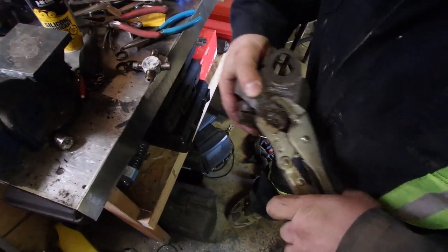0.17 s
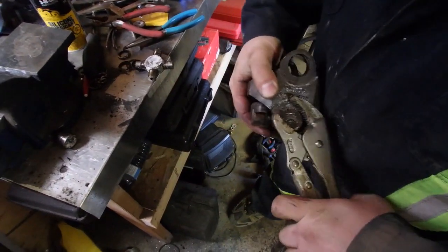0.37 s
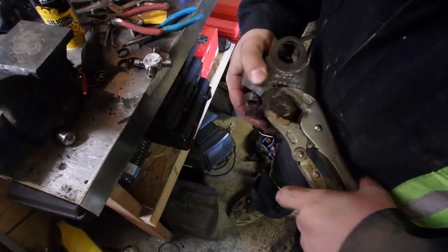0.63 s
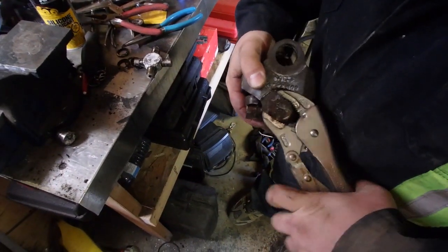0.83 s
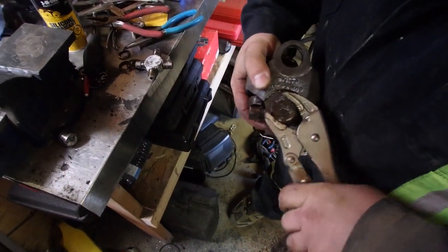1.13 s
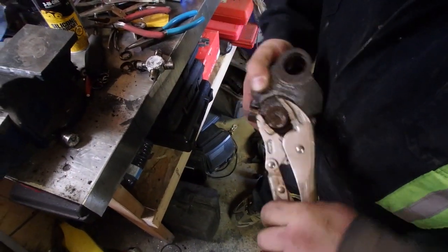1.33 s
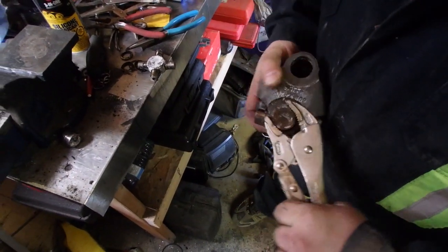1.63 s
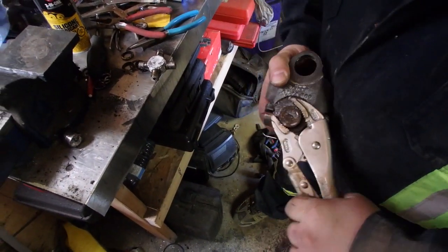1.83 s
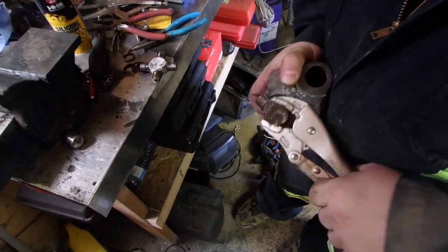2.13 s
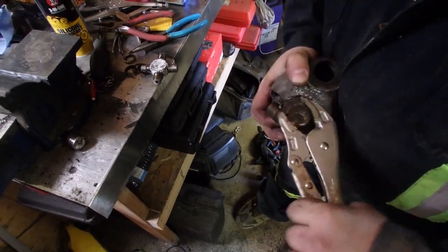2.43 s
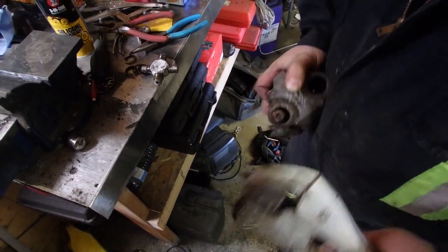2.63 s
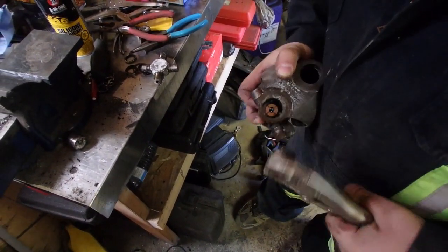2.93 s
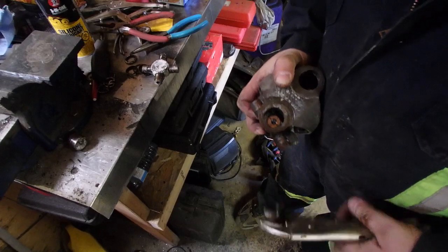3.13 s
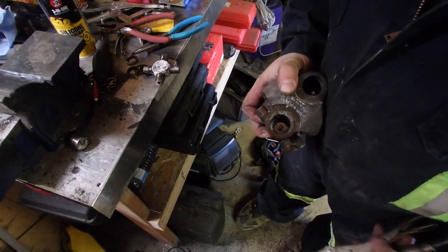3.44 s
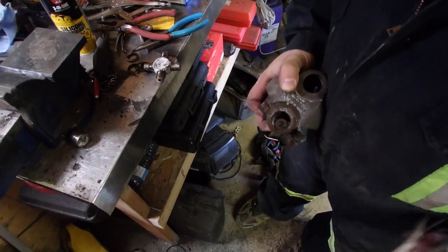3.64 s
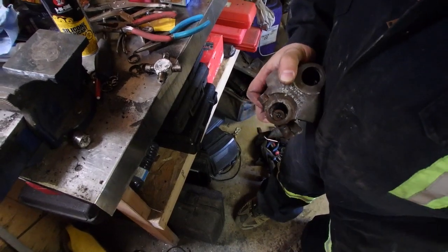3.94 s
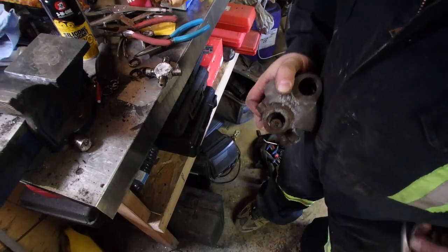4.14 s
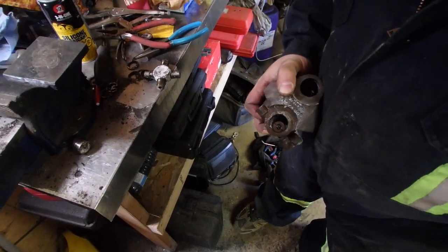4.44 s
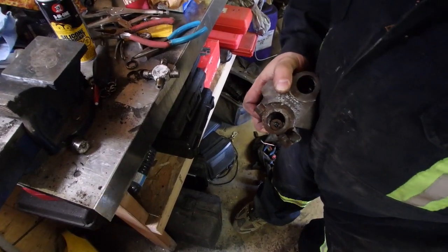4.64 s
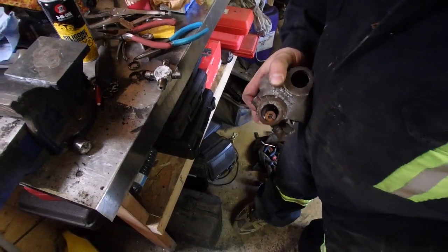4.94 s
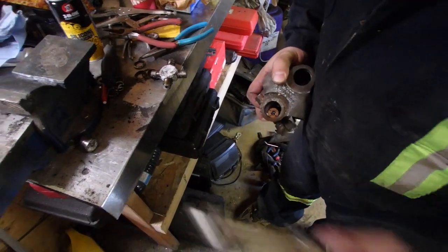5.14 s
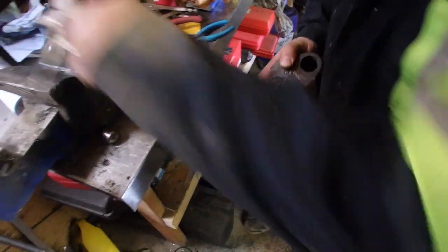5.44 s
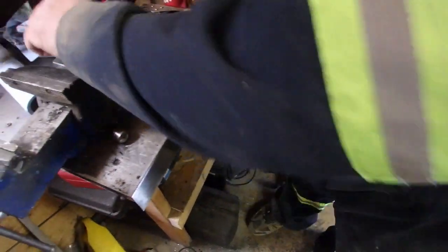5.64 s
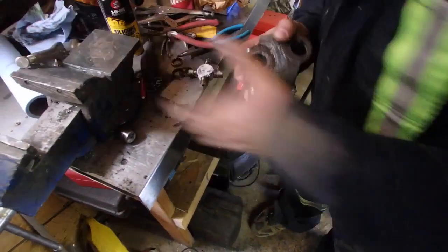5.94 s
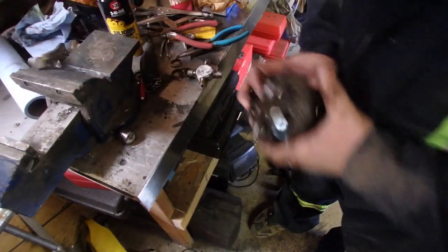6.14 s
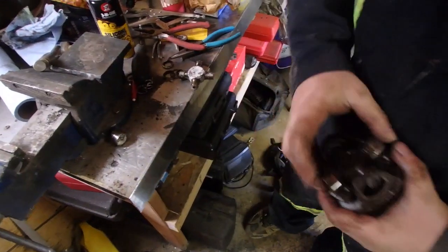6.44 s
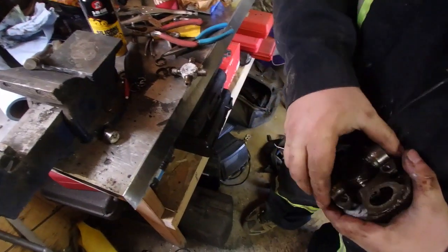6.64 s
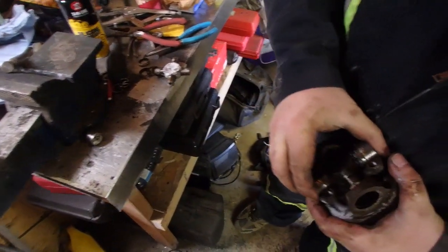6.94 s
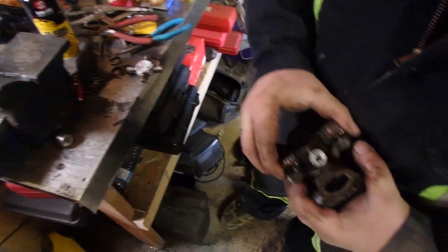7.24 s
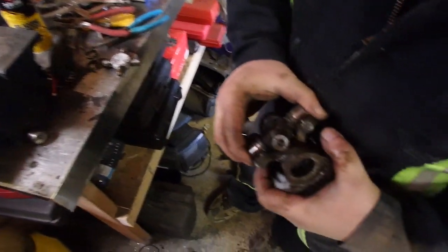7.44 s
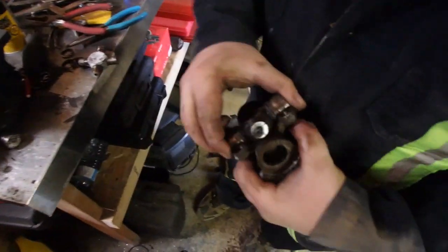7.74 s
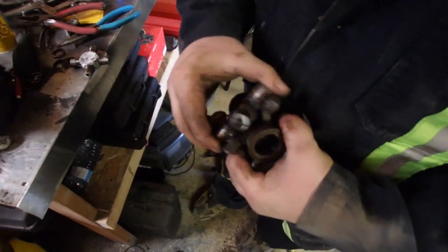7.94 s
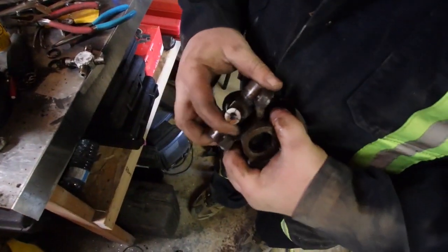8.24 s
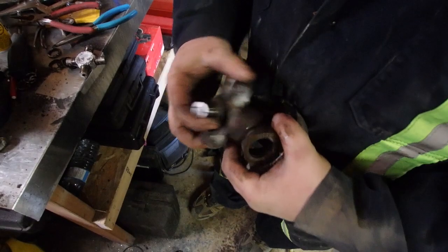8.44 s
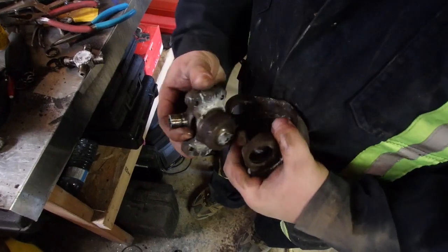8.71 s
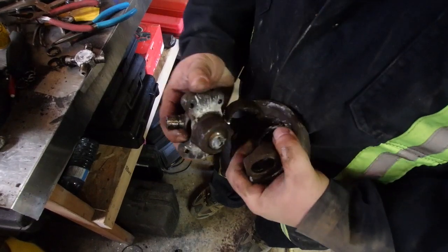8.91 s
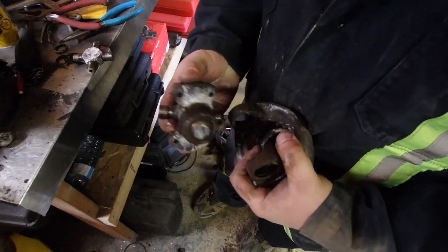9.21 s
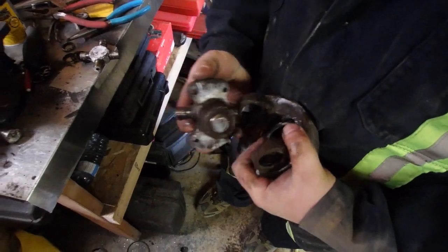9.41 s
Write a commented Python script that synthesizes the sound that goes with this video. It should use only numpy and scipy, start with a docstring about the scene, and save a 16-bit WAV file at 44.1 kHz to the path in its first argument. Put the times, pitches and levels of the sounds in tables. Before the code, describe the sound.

Locking pliers make a few short, bright clicks against a steel part, close by, over the constant chugging and hissing of an air compressor in a small workshop. Past the middle come more clicks, a brief clatter as the tool lands on the bench, and some last clinks. The microphone's level dips after each sharp hit and recovers, and the compressor carries on alone to the end.

```python
"""A piston air compressor runs steadily in a small garage, throbbing and hissing: every turn of the
pump repeats the same air, piston and valve beats, over churning air and a ringing housing.
Close to the camera, locking pliers click on a steel joint and clatter down on the workbench.
Each sharp click makes the camera's gain control duck the compressor, which then swells back."""
import sys
import numpy as np
from scipy import signal
from scipy.fft import rfft, irfft, next_fast_len
from scipy.io import wavfile
from scipy.ndimage import uniform_filter1d, map_coordinates

SR = 44100
rng = np.random.default_rng(int(sys.argv[2]) if len(sys.argv) > 2 else 0)


def generate_wav(sig):
    """Save sig (samples, or channels by samples) to the path in sys.argv[1] as 16-bit PCM at SR."""
    pcm = np.round(np.clip(np.atleast_2d(sig).T, -1, 1) * 32767).astype(np.int16)
    wavfile.write(sys.argv[1], SR, pcm)


N = 422037

PUMP_HZ = 19.5823  # turns each second
# Air puff, piston and valve beats. Each row: fraction of the turn, weight in dB, dull above this in Hz.
PUMP_BEATS = [(0.21, -1.9, 3000), (0.295, -1.2, 3000), (0.493, -4.1, 3000), (0.588, 13.3, 210),
              (0.771, -8.2, 3000), (0.981, -4.3, 3000)]


def amp(db):
    """Decibels to amplitude."""
    return 10 ** (np.asarray(db) / 20)


def unit(x):
    """Scale to an rms of one."""
    return x / np.sqrt(np.mean(x ** 2) + 1e-20)


def along(points, hz):
    """A curve through (Hz, value) points on a log frequency axis."""
    freqs, values = np.transpose(points)
    return np.interp(np.log(hz + 1), np.log(freqs + 1), values)


def bumps(rows, hz):
    """Gain in dB of narrow peaks or dips."""
    return sum(db / (1 + (2 * (hz - centre) / width) ** 2) for centre, width, db in rows)


def wobble(rate):
    """A smooth random curve, rate knots a second."""
    knots = rng.standard_normal(int(N * rate / SR) + 4)
    return map_coordinates(knots, [np.arange(N) * rate / SR])


def filtered(x, response):
    """Shape the spectrum of x by response(hz)."""
    n = x.shape[-1]
    padded = next_fast_len(n + 4096)
    return irfft(rfft(x, padded) * response(np.fft.rfftfreq(padded, 1 / SR)), padded)[..., :n]


def noise(level, size):
    """Stereo noise with level(hz) dB per Hz; the microphones agree less in the treble."""
    # Stereo width. Each row: frequency in Hz, side minus mid in dB.
    width = [(160, -52), (270, -24), (440, -15), (730, -27), (1200, -15), (2000, -86), (3200, -10),
             (5400, -9.5), (8800, -6), (14000, 1)]
    mid, side = filtered(rng.standard_normal((2, size)), lambda hz: amp(level(hz)) * np.sqrt(SR / 2))
    side = filtered(side, lambda hz: amp(along(width, hz)))
    return np.array([mid + side, mid - side])


def treble_meter(x):
    """Rms of the treble over 2 ms."""
    treble = signal.sosfilt(signal.butter(2, 2800, "high", fs=SR, output="sos"), x)
    power = uniform_filter1d(np.mean(treble ** 2, axis=0), size=88)
    return np.sqrt(np.abs(power) + 1e-12)


def place_hit(track, start, db, hit):
    """Mix in a hit with its treble peak at db."""
    part = track[:, round(start * SR):][:, :hit.shape[1]]
    part += (amp(db) * hit / treble_meter(hit).max())[:, :part.shape[1]]


def bench_clatter(rise_s=0.0017):
    """Loose jaws and handles clatter on the dull bench top."""
    # The pliers brush, land and settle. Each row: start in seconds, treble level in dB, T60 in seconds.
    drops = [(5.911, -21.5, 0.088), (5.9268, -8.5, 0.15), (5.989, -20.5, 0.12)]
    # Tone of the knock. Each row: frequency in Hz, relative level in dB.
    knock = [(60, -31.5), (180, -5), (380, 4.5), (900, 1.5), (1600, -2), (2400, -1), (3300, 3), (5000, -1),
             (7000, -0.5), (10000, -6.5), (14500, -25)]
    # Resonances of the bench top. Each row: centre in Hz, width in Hz, gain in dB.
    boards = [(260, 73, 8), (457, 160, 9), (686, 73, -3), (910, 95, 12), (1320, 110, 12), (1750, 250, 7)]
    track, t = np.zeros((2, N)), np.arange(SR // 4) / SR
    for start, db, t60 in drops:
        clatter = noise(lambda hz: along(knock, hz) + bumps(boards, hz), size=len(t))
        place_hit(track, start, db, clatter * (1 - np.exp(-t / rise_s)) * amp(-60 * t / t60))
    return track


def plier_clicks(firm_db=-9.5, firm_t60=0.068, crack_t60=0.02, room_db=-13, room_t60=0.26):
    """Hand-damped steel on steel: a crack, a brief ring, then the garage's answer."""
    # Each row: start in seconds, treble level in dB, brightest pitch in Hz, its emphasis in dB.
    contacts = [(0.15, -14, 3530, 18), (.986, -20, 3600, 11), (1.491, -8.3, 3920, 5),
                (4.964, -22.5, 8500, 8), (5.1841, -7, 6200, 6), (5.221, -16.5, 3840, 21),
                (5.7628, -14, 7540, 8), (5.786, -9, 6900, 6), (5.8672, -21, 7500, 6), (6.2927, -8, 2920, 5),
                (6.310, -16, 6900, 10), (6.485, -13, 4400, 27.5)]
    # Resonances of the pliers and joint. Each row: centre in Hz, width in Hz, gain in dB.
    steel = [(2650, 300, 4), (3060, 190, 23), (3530, 350, 4.5), (4010, 270, 12), (4870, 200, 10),
             (5530, 260, 16), (5770, 200, 0), (6500, 250, 11), (7050, 490, 14.5), (7140, 200, 4),
             (8600, 270, 13), (9600, 300, 2), (11600, 450, 7)]
    # Tone of the bare contact. Each row: frequency in Hz, relative level in dB.
    impact = [(200, -20), (1000, -7), (2000, 3), (3500, 0), (8000, 2.5), (12000, -3), (15000, -16)]
    track, t = np.zeros((2, N)), np.arange(SR // 4) / SR
    for start, db, bright_hz, focus_db in contacts:
        ring_t60 = firm_t60 * amp(0.88 * (db - firm_db))  # harder contacts ring longer
        crack_db = 5 - 1.2 * focus_db  # purer ones crack less
        focus = lambda hz: focus_db * np.exp(-.5 * (np.log2((hz + 1) / bright_hz) / 0.15) ** 2)
        ring = unit(noise(lambda hz: along(impact, hz) + bumps(steel, hz) + focus(hz), size=len(t)))
        crack = unit(noise(lambda hz: along(impact, hz), size=len(t)))
        fade = amp(-60 * t / ring_t60) + amp(room_db - 60 * t / room_t60)
        place_hit(track, start, db, ring * fade + crack * amp(crack_db - 60 * t / crack_t60))
    return track


def worker_shadow(machine, centre_hz=380, width_hz=110, sway_db=0.5):
    """The leaning worker shades or reflects the pump; small sways keep the low mids wandering."""
    # Each row: middle in seconds, half length in seconds, gain in dB, extra low-mid gain in dB.
    leans = [(5.75, 0.36, -1.5, 2), (6.8, 0.64, 0.8, -4), (8.4, 0.73, 0.5, 1.5)]
    t = np.arange(N) / SR
    middle_s, half_s, level_db, extra_db = np.transpose(leans)
    leaning = np.exp(-.5 * ((t[:, None] - middle_s) / half_s) ** 2)
    low_mids = filtered(machine, lambda hz: np.exp(-((hz - centre_hz) / width_hz) ** 2))
    low_mid_gain = amp(leaning @ extra_db + sway_db * wobble(rate=0.78))
    return amp(leaning @ level_db) * (machine + (low_mid_gain - 1) * low_mids)


def housing_chug(machine, ring_hz=1020, width_hz=160, depth_db=1.1, loudest_at=0.42):
    """The ring of the housing swells and fades once a turn."""
    turns = np.arange(N) / SR * PUMP_HZ
    ring = filtered(machine, lambda hz: np.exp(-((hz - ring_hz) / width_hz) ** 2))
    swell = unit(amp(depth_db * np.cos(2 * np.pi * (turns - loudest_at))))
    return machine + (swell - 1) * ring


def air_hiss(flutter_db=0.5, throb_db=0.47):
    """Air hisses almost evenly, with faint whistles and a slight throb on each turn."""
    # Tone of the hiss. Each row: frequency in Hz, level in dB per Hz.
    spectrum = [(600, -93), (1500, -63.5), (2300, -67), (2800, -67), (3300, -64.5), (4100, -62.5),
                (4800, -65.5), (5400, -65.5), (6000, -68), (7000, -67), (8000, -73.5), (10300, -77.5),
                (12000, -85), (14500, -100)]
    # Whistling resonances. Each row: centre in Hz, width in Hz, gain in dB.
    whistles = [(3146, 29, 10), (5330, 18, 9), (6940, 23, 10), (8750, 28, 7), (2249, 50, 6.5)]
    t = np.arange(N) / SR
    hiss = noise(lambda hz: along(spectrum, hz) + bumps(whistles, hz), size=N)
    return hiss * amp(flutter_db * wobble(rate=12) + throb_db * np.cos(2 * np.pi * PUMP_HZ * t))


def air_churn(pulsing=0.056):
    """Churning air and rattling housing: noise that swells with the pump's beats."""
    # Tone of the churn. Each row: frequency in Hz, level in dB per Hz.
    spectrum = [(20, -99), (60, -86), (130, -75), (220, -75.5), (310, -60), (450, -61.5), (600, -59.5),
                (890, -59.5), (990, -51), (1100, -59.5), (1200, -55.5), (1400, -66), (1800, -73),
                (3000, -120)]
    turns = np.arange(N) / SR * PUMP_HZ
    stroke = sum(amp(db) * np.exp(12 * (np.cos(2 * np.pi * (turns - at)) - 1))
                 / (1 + (1000 / dull_hz) ** 4) for at, db, dull_hz in PUMP_BEATS)
    swell = unit(1 + pulsing * unit(stroke - stroke.mean()))
    return swell * noise(lambda hz: along(spectrum, hz), size=N)


def pump_tones(smear=0.64, drift=0.13):
    """Every turn repeats the same beats; the room colours each harmonic as the worker moves."""
    # Strong harmonics. Each row: multiple of the turn rate, level in dB.
    strong = [(4, -42), (7, -47), (8, -42), (9, -51), (11, -29), (12, -42.5), (13, -45), (15, -42),
              (16, -44.5), (17, -40), (18, -42.5), (19, -45), (20, -44), (21, -48), (22, -41.5),
              (28, -37.5), (33, -48), (36, -48), (41, -43.5), (43, -42), (49, -38.5), (50, -31.5),
              (51, -38.5), (53, -35), (54, -36), (55, -43), (58, -51), (60, -42), (61, -38.5), (62, -41)]
    # The weaker harmonics between them. Each row: frequency in Hz, level of each in dB.
    weak = [(20, -121), (60, -79), (100, -56.5), (125, -54.5), (200, -74), (280, -43.5), (470, -53),
            (650, -48.5), (750, -74), (900, -62), (1150, -45.5), (1320, -52.5), (1500, -58), (2200, -68)]
    orders = np.arange(2048)
    hz = orders * PUMP_HZ
    level = np.where(hz < weak[-1][0], along(weak, hz), -np.inf)
    for order, db in strong:
        level[round(order)] = db
    beats = sum(amp(db) * np.exp(-2j * np.pi * orders * at) / (1 + (hz / dull_hz) ** 4)
                for at, db, dull_hz in PUMP_BEATS)
    # housing and walls delay each pitch differently, so beats arrive as chugs, not clicks
    offset_khz = hz / 1000 - 1
    lag = 18 * offset_khz ** 2 + smear * offset_khz * rng.standard_normal(len(orders))
    harmonics = amp(level) * np.exp(1j * (np.angle(beats) + lag))
    turn = np.arange(N) / SR * PUMP_HZ % 1

    def looped(spectrum):
        """One turn's sound, over and over."""
        cycle = irfft(spectrum, 2 * len(orders)) * len(orders) * np.sqrt(2)
        return np.interp(turn, np.linspace(0, 1, len(cycle) + 1), np.append(cycle, cycle[0]))

    # reflections off the moving worker disturb short waves most
    reflected = harmonics * drift * hz / 1000
    echoes = [wobble(rate=3) * looped(reflected * np.exp(2j * np.pi * rng.random(len(orders))))
              for _ in range(4)]
    return looped(harmonics) + sum(echoes)


def compressor():
    """Pump tones and churn chug in the housing and pass the worker; the hiss sits on top."""
    machine = pump_tones() + air_churn()
    hiss = air_hiss()
    return worker_shadow(housing_chug(machine)) + hiss


def microphone_pair(hz):
    """Short waves reach the two microphones with different level and phase, long waves alike."""
    # Treble balance. Each row: frequency in Hz, left minus right in dB before the bass is centred.
    balance = [(60, 0.0), (99, 0.0), (160, 0.0), (270, 0.0), (440, -0.5), (730, -14), (1200, 3),
               (1980, 0.0), (3260, 0), (5370, 2.0), (8840, 1), (14600, 0)]
    # Treble phase. Each row: frequency in Hz, lead of the left in radians before the bass is centred.
    lead = [(0, -5.2), (2840, 0.26), (3100, 0.5), (4130, -0.3), (4390, -2), (4740, 0.8), (5510, 0.1),
            (5940, -2), (6370, 1), (7150, -1.2), (9040, 1), (14700, 0.5)]
    share = np.outer([.5, -.5], 1 / (1 + (1800 / (hz + 1)) ** 4))
    return amp(share * along(balance, hz)) * np.exp(1j * share * along(lead, hz))


def scene():
    """Compressor and handwork at the camera's two microphones."""
    return filtered(compressor() + plier_clicks() + bench_clatter(), microphone_pair)


def gain_control(x, threshold_db=-22, recovery_db_per_s=11.5, start_cut_db=7.5, attack_s=0.0019):
    """Treble peaks duck the gain at once; it starts ducked and always climbs back steadily."""
    excess_db = np.maximum(20 * np.log10(treble_meter(x)) - threshold_db, 0)
    climb_db = recovery_db_per_s * np.arange(N) / SR
    cut_db = np.maximum(np.maximum.accumulate(excess_db + climb_db), start_cut_db) - climb_db
    pole = np.exp(-1 / (attack_s * SR))
    smooth_cut_db = start_cut_db + signal.lfilter([1 - pole], [1, -pole], cut_db - start_cut_db)
    return x * amp(-smooth_cut_db)


def record(dry, ceiling=0.6, top_hz=14600):
    """The camera: gain control, narrow dips, soft clipping and a band limit."""
    # Dips in the camera's response. Each row: centre in Hz, width in Hz, gain in dB.
    notches = [(2027, 38, -19.5), (3046, 67, -20), (4080, 25, -20), (4590, 162, -15), (5150, 57, -21),
               (6110, 78, -20)]
    notched = filtered(gain_control(dry), lambda hz: amp(bumps(notches, hz)))
    clipped = notched / (1 + (notched / ceiling) ** 6) ** (1 / 6)
    return filtered(clipped, lambda hz: hz < top_hz)


dry = scene()
out = record(dry)
generate_wav(out)
```